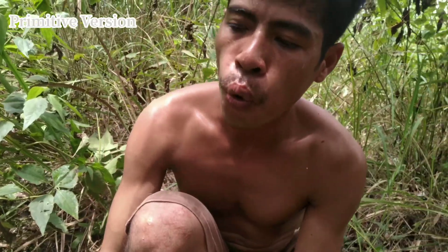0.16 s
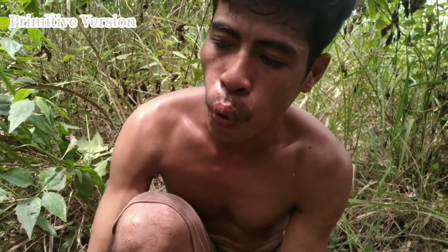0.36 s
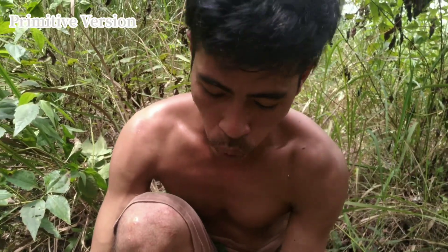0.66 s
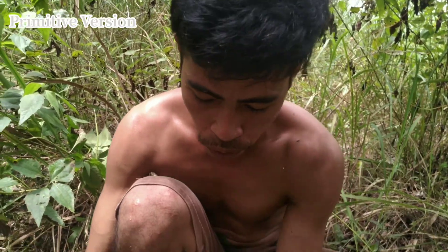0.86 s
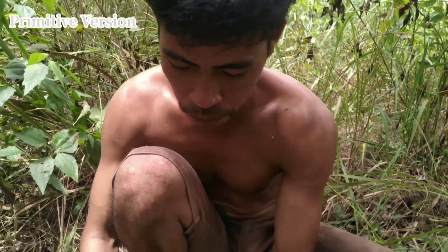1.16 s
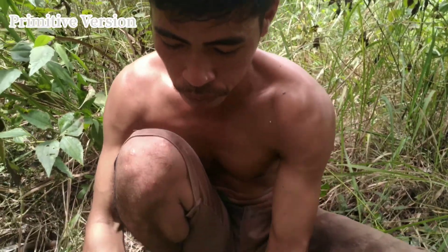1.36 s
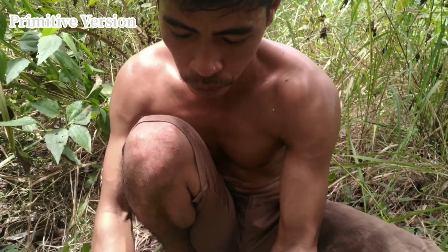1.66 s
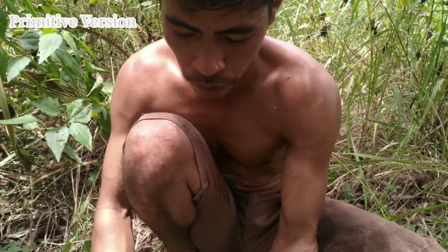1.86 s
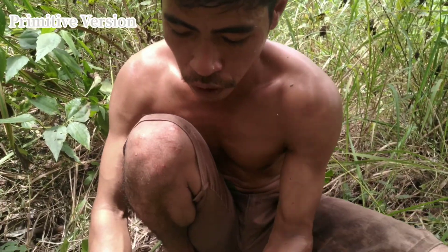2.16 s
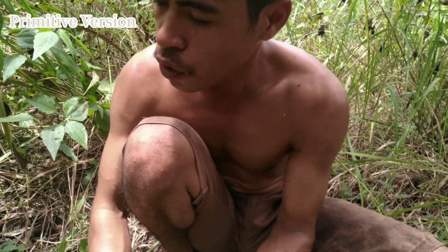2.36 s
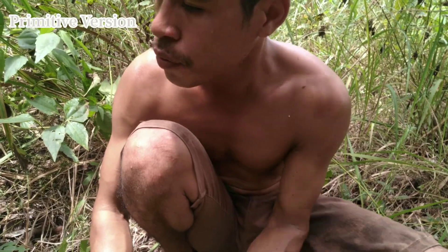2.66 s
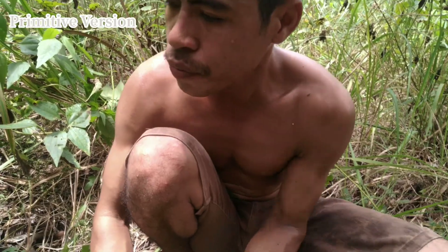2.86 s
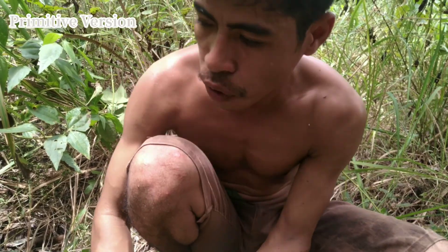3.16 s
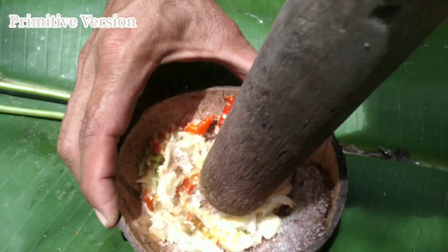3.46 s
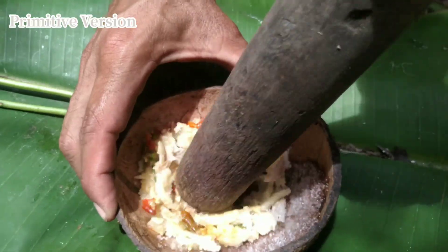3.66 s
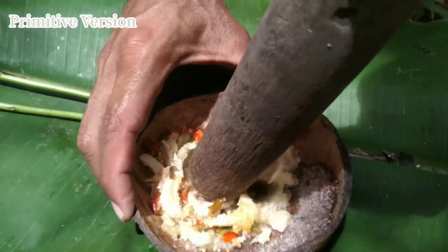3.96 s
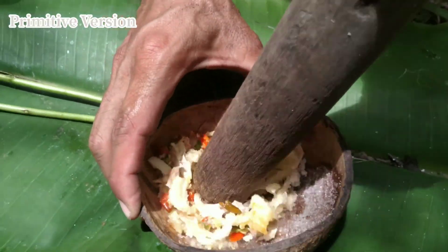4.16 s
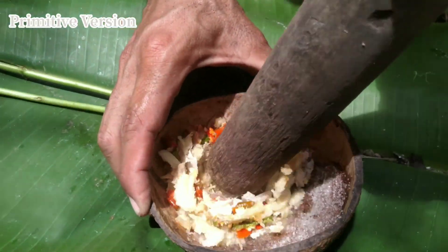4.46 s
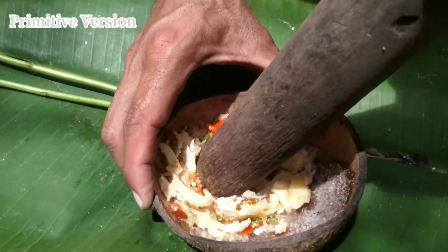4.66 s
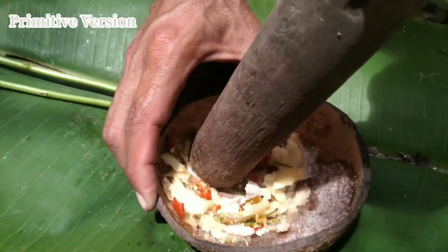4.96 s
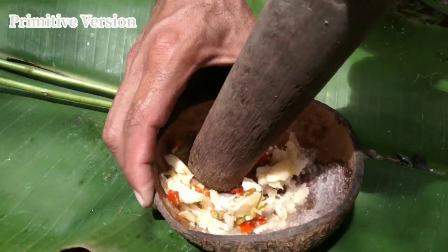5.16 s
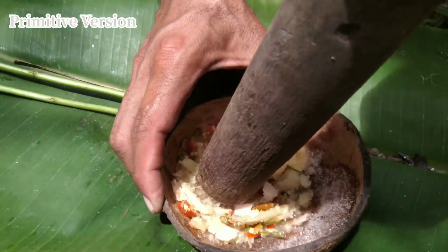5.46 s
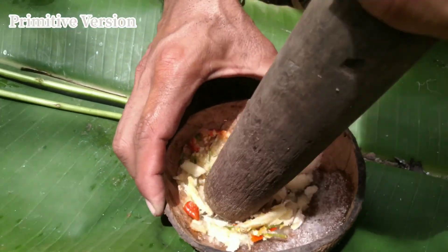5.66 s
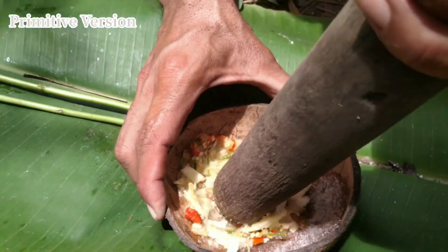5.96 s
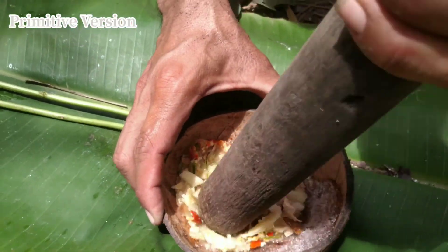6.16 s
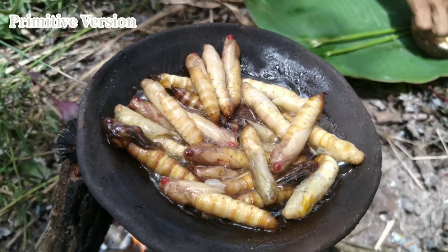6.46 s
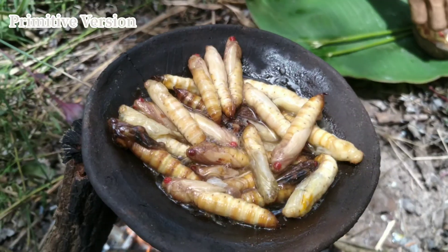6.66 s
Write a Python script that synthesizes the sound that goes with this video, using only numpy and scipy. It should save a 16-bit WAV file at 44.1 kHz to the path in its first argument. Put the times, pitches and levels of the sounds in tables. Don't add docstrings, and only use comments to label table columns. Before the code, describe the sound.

From 0 to 3.4 seconds a wooden pestle taps food in a small shell mortar, roughly every 0.23 seconds: short dull knocks of uneven strength, a muted hollow ring, a soft low thud from the soil just after, and light wet crunching. A dry twig snaps at about 1.7. Underneath, a distant one-cylinder engine puffs ten times a second as a low throb, with leaf hiss and wind rumble mostly on the left. A hard cut leaves a blink of silence. From 3.4 to 6.3 the blows come about every 0.26 seconds, harder and closer, strongest near 4.4, with juicy crunches, squeaks, sliding paste and crumbs ticking. Wind slaps the left side at 5.6 and 6.2. After another brief silence, from 6.35 to 7 the bed fades back quickly without pounding, and fat sizzles faintly with crisp little spits. Close, dry stereo pickup in open air.

```python
import sys
import numpy as np
from scipy import signal
from scipy.fft import rfft, irfft
from scipy.io import wavfile
from scipy.ndimage import uniform_filter1d

SR = 44100
rng = np.random.default_rng(int(sys.argv[2]) if len(sys.argv) > 2 else 0)


def unload_wav(signal):
    wavfile.write(
        sys.argv[1],
        SR,
        np.round(np.clip(np.atleast_2d(signal).T, -1, 1) * 32767).astype(np.int16),
    )


def nominal_scale(level):
    x = np.asarray(level, float) / 20
    return 10 ** x


N = 300762
TIME = np.arange(N) / SR
FREQ = np.maximum(np.fft.rfftfreq(N, 1 / SR), 1)

# start in seconds, end in seconds, fade-in in seconds, engine level in dB,
# leaf hiss level in dB.
SHOTS = [
    (0, 3.389, 0.00062, -39.5, 4.5),
    (3.435, 6.288, 0.22, -38.5, 2.5),
    (6.345, 7, 0.24, -38, 5),
]
CUT_S = 0.00008

# time in seconds, knock peak in dB, contact length in ms,
# shell ring in dB, dwell (how long the pestle stays pressed, as a share).
BLOWS = [(.001, -55, 0.55, -3, .2), (.222, -27.5, 0.52, -2, .1), (.455, -33, 0.44, 5, .2),
         (.684, -40.5, 0.52, 4.5, .2), (.917, -34, 0.64, 4, .2), (.923, -55.5, 0.51, 3, .2),
         (1.136, -45.5, 0.24, 1.5, .2), (1.359, -47, 0.25, 2, .2), (1.5765, -36.5, 0.43, -4, .3),
         (1.816, -46.5, 0.28, -8, .2), (2.010, -39.5, 0.6, 5, .2), (2.240, -39, .4, 4, .2),
         (2.489, -45.5, 0.32, 5, .2), (2.708, -52, 0.4, 2, .2), (2.943, -43, .8, 3, .2),
         (3.169, -39.5, 0.91, 0, .2), (3.6056, -21.5, 0.82, 8, .05), (3.8548, -21.5, 0.27, -13, 1.5),
         (4.1344, -17, 0.44, -11, .5), (4.146, -34.5, 0.33, -4, .2), (4.3865, -11.5, .36, -6, .15),
         (4.647, -29, 1.03, -3.5, .3), (4.661, -34, 0.43, 3, .2), (4.913, -37, 0.69, 0, .2),
         (5.1744, -20, 0.33, -18, .15), (5.423, -49, 0.4, 5, .2), (5.665, -47, 0.36, -4, .2),
         (5.902, -42, 0.8, 5, .3), (6.146, -32, 0.68, 5, .3)]
BOUNCES = [(5.1769, -29, 0.55, -12, 0.9), (5.182, -36, 0.37, 0, 0.47), (4.1405, -39, .45, -2, .1),
           (6.148, -32, 0.39, 0, 0.23), (1.584, -39.5, 0.3, 0, 0.092)]
# pitch in Hz, level in dB, time to fade by 60 dB in seconds.
SHELL = [(237.7, -1, 0.025), (325, -8, 0.035), (426, -8.5, 0.016), (632, -2, 0.019), (900, -4.5, 0.027),
         (1260, -6.5, 0.017), (1550, -12, .01), (4440, -9, .01)]
DIP_SHARE, DIP_LOSS_PER_MS = 1.35, 1.12
RELEASE_MS, REBOUND = 4.294, 0.18
# frequency in Hz, level in dB per Hz.
CRACK = [(500, -12.5), (1000, 0), (1600, 12.5), (2300, -5), (3200, -4), (4400, -7.5), (6000, -14.5),
         (8000, -36), (11000, -26.5), (16000, -17.5)]
CRACK_DB, CRACK_DB_PER_MS = -36, 17.5
CRACK_LATE = 2.2

# first crest in seconds, level in dB, pitch in Hz,
# depth of the dip before it (0 to 2), ring time in ms.
THUDS = [(.035, -48, 98, .6, 20), (0.237, -33.5, 80, 0.85, 21), (.466, -32.5, 92, 0.54, 18),
         (0.701, -33.5, 96, 0.67, 12), (.933, -35, 96, 0.76, 9), (1.149, -47, 105, .6, 20),
         (1.376, -42.5, 102, 0.51, 14), (1.598, -39, 90, .3, 14), (2.0241, -38.5, 91, .6, 25),
         (2.257, -48, 106, .6, 20), (2.497, -46.5, 75, .6, 20), (2.957, -50, 65, .6, 22),
         (3.186, -41, 78, .6, 19), (3.6202, -26, 79, .5, 17), (3.871, -29, 75, .3, 14.6),
         (4.152, -24, 80, .1, 13), (4.403, -21, 85.4, .03, 9.6), (4.678, -28.5, 75, 1.3, 4.3),
         (4.9446, -32, 72, 0.95, 15), (5.192, -20, 84, 0.55, 13), (5.438, -32.5, 84, 0.79, 16),
         (5.6767, -32, 94, 1.4, 14), (5.915, -24, 92, 1.2, 13), (6.160, -26.5, 96, 1.5, 17)]
THUD_DIP_MS = 3.78

# peak time in seconds, level in dB, fall time in ms,
# pitch of the hollow under the pestle in Hz.
CRUSHES = [(0.002, -58, 8, 3720), (0.225, -51, 6.7, 3580), (0.454, -57, 19, 3800), (0.691, -55.5, 11, 3420),
           (0.926, -52.5, 6, 1570), (1.14, -56, 11, 4130), (1.369, -54.5, 11, 4330),
           (1.583, -52.5, 12.4, 4400), (1.821, -54.5, 12.5, 4140), (2.014, -54, 18.7, 4140),
           (2.259, -50, 15.3, 4350), (2.501, -53, 11, 3750), (2.722, -60, 22, 3730),
           (2.955, -57.5, 22, 3930), (3.187, -56.5, 14, 3780), (3.614, -48.5, 16.2, 3340),
           (3.87, -47, 17.5, 3900), (4.151, -47.5, 12.2, 3320), (4.39, -42, 14.4, 4600),
           (4.666, -44.5, 12.3, 3240), (4.92, -48, 15, 1010), (5.1775, -47.5, 13.6, 3020),
           (5.427, -49, 9.3, 2980), (5.666, -45, 8.5, 3600), (5.905, -41.5, 5.8, 1520),
           (6.148, -45.5, 9.9, 3370)]
PULP_DB = [2.5, 0, 2.5, 2, 2, -1.5, 2, -1, -1.5, -2, -1, 0, -0.5, 0.5, -1, -3.5, -1.5, -3.5, -3, -4, 0.5,
           1.5, 0.5, -0.5, -3.5, 0]
# peak time in seconds, level in dB,
# fall time in ms, pitch of the hollow in Hz.
SLIDES = [(0.266, -70, 8.2, 3170), (0.825, -70, 7.2, 2800), (3.132, -66, 5.4, 2400),
          (3.664, -72.5, 10, 3500), (3.932, -60, 21, 3770), (4.128, -55, 32, 4900), (4.414, -57, 4.5, 3730),
          (4.465, -70, 26, 3700), (4.721, -59.5, 10, 3580), (5.009, -67, 5.6, 3220),
          (5.232, -65, 8.5, 2880), (5.405, -68, 6.1, 4300), (5.415, -60, 6.2, 3000),
          (5.655, -53, 7.9, 3300), (5.707, -63.5, 5.5, 3400), (5.886, -62.5, 24, 4800),
          (6.142, -58.5, 4.6, 3580), (0.075, -70, 18, 3200)]
# frequency in Hz, level in dB per Hz.
CRUSH = [(710, -41.5), (1200, -6), (1730, 2), (2300, -9.5), (3050, -8), (3590, -9.5), (4450, -9),
         (5020, -13), (6650, -16.5), (7820, -38), (10100, -18), (14200, -26), (16000, -28)]
# frequency in Hz, level in dB per Hz.
DULL = [(150, 6.5), (300, -3), (700, 0), (1200, -5.5), (2200, -36.5)]
RISE_SHARE, TOUCH_LAG_MS, EARLY_MS_PER_DB = 0.69, 1.1, 0.1267
HARD_BLOW_DB, DULL_DB, DULL_PER_BLOW_DB = -14.5, 6, 0.22
SLIDE_RISE_MS, SLIDE_DULL_DB = 4.5, -3.5

# time in seconds, peak in dB, centre frequency in Hz.
TICKS = [(0.265, -66, 3080), (0.28, -43.5, 1470), (0.340, -40, 734), (.659, -55, 3000), (1.611, -43, 800),
         (1.627, -51, 750), (1.912, -48, 1200), (3.133, -50.5, 2430), (3.144, -58, 2400),
         (3.666, -54, 2500), (4.017, -57.5, 4000), (4.435, -45.5, 1200), (4.496, -44.5, 486),
         (4.557, -50, 1320), (4.627, -56, 2000), (3.6255, -45, 3520), (4.1295, -45, 900),
         (4.3985, -45, 3000), (4.3885, -36, 4500), (.686, -42, 700), (.2255, -44, 1600), (1.817, -46, 450),
         (4.9215, -40, 1000), (4.1395, -32, 1200), (3.861, -36, 1200), (5.193, -40, 1100),
         (5.1805, -46, 1000), (5.1852, -42, 1000), (3.8725, -56, 4400), (4.154, -55, 3500),
         (4.668, -46, 3200), (5.204, -44, 900), (5.247, -63, 4000), (5.473, -43, 900), (5.958, -54.5, 3000)]
# time in seconds, peak in dB, centre frequency in Hz.
TWIGS = [
    (1.6672, -33.5, 2000),
    (6.2585, -58, 900),
]
# middle in seconds, level in dB, pitch in Hz.
POPS = [(0.0032, -54, 3620), (0.2257, -47, 3700), (0.2272, -55, 2240), (0.4572, -55, 2500),
        (0.4575, -54, 3620), (0.6914, -52, 3450), (0.9249, -52, 2500), (0.9269, -55, 3790),
        (1.1377, -52, 4130), (1.1414, -56, 4310), (1.1437, -56, 3960), (1.3689, -54, 4220),
        (1.3751, -56, 4220), (1.5804, -52, 3620), (1.5851, -51, 4310), (1.5864, -54, 2240),
        (1.8211, -51, 4050), (2.0139, -49, 4050), (2.0184, -48, 4220), (2.2429, -56, 4390),
        (2.2541, -51, 4130), (2.2546, -53, 3190), (2.2596, -45, 4130), (2.2654, -47, 4390),
        (2.2686, -54, 3270), (2.2716, -51, 3960), (2.4886, -52, 3270), (2.4926, -54, 4130),
        (2.4998, -54, 4220), (2.5043, -50, 3620), (2.7221, -55, 3100), (2.949, -54, 4130),
        (2.9578, -55, 3010), (2.9618, -55, 3700), (3.1888, -50, 3530), (3.6125, -45, 3450),
        (3.8727, -45, 4390), (3.8784, -46, 3700), (4.1378, -48, 4570), (4.1421, -48, 4740),
        (4.1451, -45, 2580), (4.1538, -45, 3620), (4.389, -47, 2760), (4.3893, -34, 4480),
        (4.394, -41, 4480), (4.3988, -43, 3100), (4.4067, -46, 3700), (4.6564, -49, 4220),
        (4.6651, -39, 3530), (4.6679, -39, 2930), (4.6749, -44, 3270), (5.1772, -46, 3190),
        (5.1775, -47, 4480), (5.4289, -48, 3010), (5.6664, -42, 3190), (5.9038, -40, 3530),
        (5.9053, -40, 1290), (5.9093, -45, 2930), (6.1495, -42, 3700), (6.1555, -46, 3450)]
POP_DB, POP_MS = -4.5, 1.15
# time in seconds, level in dB, pitch in Hz.
KNOTS = [(5.185, -31, 1150), (5.1925, -38, 950), (5.2055, -40, 800), (3.865, -41, 800), (4.129, -44, 900),
         (4.1495, -33, 850), (4.678, -42, 1650), (4.665, -41, 500), (2.248, -44, 810), (2.26, -41, 660),
         (2.499, -45, 850), (1.366, -46, 830), (1.587, -42, 800), (.924, -41, 900), (4.9225, -37, 1010),
         (5.666, -38, 810), (5.658, -43, 1600), (2.017, -47, 890), (1.668, -45, 1130), (1.669, -48, 1900),
         (5.901, -44, 1410), (5.426, -44, 710), (5.1765, -36, 1550), (5.181, -38, 1200),
         (3.8605, -37, 1150), (4.138, -36, 1200), (4.399, -36, 950), (4.392, -30, 760), (3.611, -33, 210),
         (5.182, -33, 210), (4.141, -33, 280), (.2255, -48, 1650), (1.151, -51, 800), (6.15, -42, 1000)]
# frequency in Hz, left minus right in dB.
PESTLE_BALANCE = [(60, -5.0), (110, -6.5), (200, -9.5), (380, -9.5), (700, -7.5), (1290, -5.5), (2380, 2.5),
                  (4400, 4.0), (8120, -0.5), (15000, -2.0)]
LEFT_LAG_S = 11 / 44100

# peak time in seconds, level in dB.
GUSTS = [(0.0, -39), (0.25, -53), (0.5, -47), (1.125, -44), (1.375, -50), (1.625, -44), (2.125, -45.5),
         (3.0, -40.5), (3.25, -47), (3.5, -42.5), (3.9, -42), (4.25, -34), (4.6, -38.5), (5.5, -41),
         (5.86, -39), (6.375, -45), (6.625, -42.5)]
CALM_DB, GUST_FADE_DB_PER_S = -51.5, 98
# frequency in Hz, level in dB per Hz.
WIND = [(20, -34), (35, -3), (52, 10), (70, 2), (110, -17), (200, -13), (400, -63)]
# time in seconds, peak in dB, ring pitch in Hz,
# ring time in ms, flutter level in dB.
SLAPS = [(1.236, -46.5, 70, 9.9, -64), (2.974, -38.5, 68, 10.6, -50.5), (3.296, -41, 72, 9.5, -52.5),
         (5.624, -42.5, 70, 6.1, -46), (6.196, -34, 68, 6.8, -40.5), (6.255, -45.5, 69, 25, -46.5)]

# frequency in Hz, level in dB per Hz.
AIR = [(18, -34.5), (30, -6), (75, -7), (93, -11), (109, -7.5), (200, -16), (330, -28.5), (584, -29.5),
       (1540, -35), (2750, -35.5), (3140, -37), (3770, -37), (7870, -47.5), (13000, -43.5), (16000, -50)]
# frequency in Hz, left minus right in dB.
AIR_BALANCE = [(60, -1), (200, -6), (700, -4.5), (3000, -2), (8000, -0.5), (15000, -1.5)]
AIR_DB = -57.5

# time of one puff in seconds, time between puffs in seconds.
PUFFS = [(.138, .10055), (3.519, .10057), (6.457, .1004)]

# frequency in Hz, level in dB per Hz.
SIZZLE = [(710, -39), (1200, -8), (1640, -15), (1790, -30), (2100, -14), (3080, -2), (3910, -6), (6370, -9),
          (8080, -27), (9720, -15.5), (16000, -21)]
# time in seconds, level in dB.
SIZZLE_DB = [(6.4, -69), (6.6, -69.5), (6.74, -70), (6.78, -67), (6.82, -65)]
# time in seconds, peak in dB.
SPITS = [(6.3694, -62), (6.4053, -49), (6.475, -54), (6.4854, -49), (6.537, -43), (6.544, -47),
         (6.647, -52), (6.6723, -39.5), (6.683, -46), (6.56, -52), (6.605, -52), (6.778, -47), (6.787, -45),
         (6.796, -40), (6.812, -45)]
PAN_LAG = (12, 0)


def curve(table, hz=FREQ):
    f, db = np.transpose(table)
    return nominal_scale(np.interp(np.log(hz), np.log(f), db))


def colour(x, table):
    y = irfft(rfft(x) * curve(table), N)
    return y / np.sqrt(np.mean(y ** 2))


def walk(rate):
    k = int(SR / rate)
    steps = np.repeat(rng.standard_normal(N // k + 1), k)
    return 0.66 * uniform_filter1d(uniform_filter1d(steps, k), k)[:N]


def grains(spread_db):
    size = np.minimum(rng.exponential(size=N // 16 + 1), 3.5)
    return rng.standard_normal(N) * nominal_scale(spread_db * np.repeat(size, 16)[:N])


def patchy(x, spread_db, rate):
    spectrum, out = rfft(x), 0
    for step in range(14, 29):
        band = np.cos(np.pi / 2 * np.clip(2 * np.log2(FREQ) - step, -1, 1)) ** 2
        out = out + nominal_scale(spread_db * walk(rate)) * irfft(spectrum * band, N)
    return out / np.sqrt(np.mean(out ** 2))


def add(track, s, x):
    i = max(int(s * SR), 0)
    track[i:i + len(x)] += x[:max(len(track) - i, 0)]


def contact(ms, contact_ms, dwell):
    def bump(at, rise, fall):
        return np.exp(-((ms - at) / np.where(ms < at, rise, fall)) ** 2)

    depth = np.clip(DIP_SHARE - DIP_LOSS_PER_MS * contact_ms, 0, 2)
    dip = depth * bump(0, 1.56 * contact_ms, 0.99 * contact_ms)
    crest = bump(1.94 * contact_ms, 1.04 * contact_ms, 1.18 * contact_ms)
    plateau = dwell * bump(0.59 * RELEASE_MS, 2.0, 0.7)
    release = (REBOUND + 0.72 * dwell) * bump(RELEASE_MS, 0.34, 0.74)
    return crest - dip + plateau - release


def shell_ring(t, ring_db, luck):
    ring = 0
    for k, (hz, db, t60) in enumerate(SHELL):
        level = nominal_scale(db + ring_db + 0.68 * luck[k]) * 2 * np.pi * hz / SR
        note = np.cos(2 * np.pi * hz * (1 + 0.12 * luck[-k - 1]) * t)
        ring = ring + level * note * np.exp(-np.log(1000) * t / t60)
    return ring


def knocks():
    out, crack, t = np.zeros(N), np.zeros(N), TIME[:SR // 16]
    hits = BLOWS + BOUNCES
    chance = rng.standard_normal((len(hits), 2 * len(SHELL)))
    for (s, db, contact_ms, ring_db, dwell), luck in zip(hits, chance):
        push = contact((t - 0.0026) * 1000, max(contact_ms, 0.15), np.clip(dwell, 0, 1.5))
        knock = push + np.convolve(push, shell_ring(t, ring_db, luck))[:len(t)]
        add(out, s, nominal_scale(db + 2.5) * knock / np.abs(knock).max())
        crack_s = s + 0.0015 + CRACK_LATE * contact_ms / 1000
        crack_db = db + CRACK_DB + CRACK_DB_PER_MS * contact_ms
        add(crack, crack_s, nominal_scale(crack_db) * np.exp(-t / 0.001))
    return out + crack * colour(grains(1.8), CRACK)


def strokes():
    rows = []
    for (s, db, fall_ms, hollow_hz), pulp_db in zip(CRUSHES, PULP_DB):
        touch, blow_db = next(blow[:2] for blow in BLOWS if blow[0] > s - 1 / 32)
        soft = HARD_BLOW_DB - blow_db
        rise_ms = RISE_SHARE * max((s - touch) * 1000 - TOUCH_LAG_MS, 0) + EARLY_MS_PER_DB * soft
        dull_db = DULL_DB - DULL_PER_BLOW_DB * soft + pulp_db
        rows.append((s, db, rise_ms, fall_ms, dull_db, hollow_hz))
    for s, db, fall_ms, hollow_hz in SLIDES:
        rows.append((s, db, SLIDE_RISE_MS, fall_ms, SLIDE_DULL_DB, hollow_hz))
    return rows


def crushes():
    out, size = np.zeros((2, N)), 8192
    bright = np.array([colour(grains(4.0), CRUSH) for _ in range(2)])
    dull = np.array([colour(grains(3.7), DULL) for _ in range(2)])
    bright = patchy(bright, 5.45, 170)
    dull = patchy(dull, 4.7, 90)
    for s, db, rise_ms, fall_ms, dull_db, hollow_hz in strokes():
        start = max(int(s * SR) - size // 2, 0)
        part = slice(start, start + size)
        t = TIME[part] - s
        u = t * 1000 / np.where(t < 0, max(rise_ms, 1), max(fall_ms, 2))
        shape = nominal_scale(db) * (np.exp(-1.1 * u ** 2) + 0.1 * np.exp(-(u / 3.36) ** 4))
        snaps = shape * bright[:, part]
        hollow = signal.lfilter(*signal.iirpeak(hollow_hz, 4.5, fs=SR), snaps)
        squelch = nominal_scale(3.5 + dull_db) * shape * dull[:, part]
        out[:, part] += nominal_scale(-1.2) * snaps + nominal_scale(-7) * hollow + squelch
    return out


def pops():
    out, t = np.zeros(N), TIME[:SR // 100]
    swell = np.exp(-((t - 1 / 200) * 1000 / POP_MS) ** 2)
    for s, db, hz in POPS:
        add(out, s - 1 / 200, nominal_scale(db + POP_DB) * np.sin(2 * np.pi * hz * t) * swell)
    for s, db, hz in KNOTS:
        add(out, s, -nominal_scale(db - 1.5) * np.sin(2 * np.pi * hz * t) * np.exp(-t / 0.0025))
    return out


def thud(hz, dip, ring_ms):
    t = TIME[:SR // 8] - 1 / 32
    turn = -1 / 4 / hz
    give = np.clip((turn - t) * 1000 / THUD_DIP_MS, 0, 1)
    fade = np.exp(-(np.maximum(t, 0) * 1000 / max(ring_ms, 3)) ** 1.4)
    ring = np.cos(2 * np.pi * hz * t) * fade
    return np.where(t < turn, -dip * np.sin(np.pi * give ** 0.67), ring)


def thuds():
    out = np.zeros(N)
    for s, db, hz, dip, ring_ms in THUDS:
        add(out, s - 1 / 32, nominal_scale(db - 1.5) * thud(hz, dip, ring_ms))
    return out


def ticks(table, rattle_gain, rattle_ms):
    out, t = np.zeros(N), TIME[:400]
    for (s, db, hz), noise in zip(table, rng.standard_normal((len(table), len(t)))):
        fading = noise * np.exp(-t * 1000 / rattle_ms)
        rattle = signal.lfilter(*signal.iirpeak(hz, 1.1, fs=SR), fading)
        snap = rattle_gain * rattle - np.exp(-((t - 0.0004) * hz * 4.0) ** 2)
        soft = signal.lfilter(*signal.butter(2, 1.15 * hz, fs=SR), snap)
        add(out, s - 0.0004, nominal_scale(db) * soft)
    return out


def pestle():
    crush, other = crushes()
    hits = knocks() + thuds() + ticks(TICKS, 1.84, 2.2) + pops()
    right = hits + crush
    unlike = np.clip(FREQ / 3970.0, 0, 0.9)
    left = rfft(hits) + np.sqrt(1 - unlike) * rfft(crush) + np.sqrt(unlike) * rfft(other)
    lag_s = LEFT_LAG_S + 0.00041 / (1 + (FREQ / 220) ** 2)
    left = irfft(left * curve(PESTLE_BALANCE) * np.exp(-2j * np.pi * FREQ * lag_s), N)
    return nominal_scale(4.0) * np.array([left, right])


def swing(hz, tau_s):
    t = TIME[:SR // 6]
    u = t / tau_s
    return -np.sin(2 * np.pi * hz * t) * (u * np.exp(1 - u)) ** 1.28


def wind():
    db = np.max([top - GUST_FADE_DB_PER_S * np.abs(TIME - s) for s, top in GUSTS], axis=0)
    gust = nominal_scale(np.maximum(db, CALM_DB) + 4.6 * walk(6.9))
    left = gust * colour(rng.standard_normal(N), WIND)
    t, flutter_t = TIME[:SR // 60], TIME[:SR // 20]
    edge = np.cos(2 * np.pi * 210 * (t - 0.005)) * np.exp(-((t - 0.0045) / 0.0018) ** 2)
    for s, db, hz, ring_ms, flutter_db in SLAPS:
        add(left, s + 0.00085, nominal_scale(db + 8.5) * edge)
        flutter = rng.standard_normal(SR // 20)
        for sharpness in (2.5, 1.5):
            flutter = signal.lfilter(*signal.iirpeak(340, sharpness, fs=SR), flutter)
        add(left, s + 0.0026, nominal_scale(flutter_db + 22.5) * flutter * np.exp(-flutter_t / 0.013))
        add(left, s + 0.0027, -nominal_scale(db + 7.5) * swing(hz, max(ring_ms, 3) / 1000))
    right = nominal_scale(-64.5 + 2.0 * walk(15)) * colour(rng.standard_normal(N), WIND)
    return np.array([left, right])


def air():
    out, swell = 0, walk(0.13)
    mid, left, right = (rfft(colour(rng.standard_normal(N), AIR)) for _ in range(3))
    alike = np.clip(1 - FREQ / 504.0, 0, 0.8)
    pair = np.sqrt(alike) * mid + np.sqrt(1 - alike) * np.array([left, right])
    pair *= np.array([curve(AIR_BALANCE) ** 0.5, curve(AIR_BALANCE) ** -0.5])
    for octave in range(5, 15):
        band = np.cos(np.pi / 2 * np.clip(np.log2(FREQ) - octave, -1, 1)) ** 2
        out = out + nominal_scale(0.21 * swell + 1.0 * walk(9.6)) * irfft(pair * band, N)
    return nominal_scale(AIR_DB) * out


def engine():
    out, t = np.zeros((2, N)), TIME[:SR // 16] - 1 / 32
    echo = -np.exp(-(t / 0.003) ** 2)
    for (start, end, _, db, _), (first, period) in zip(SHOTS, PUFFS):
        for s in first + period * np.arange(-2, 34):
            size_db, shift = rng.standard_normal(2)
            if not start < s < end:
                continue
            for track, pan_db, lag in zip(out, (-2.5, 1.5), (0.0003, 0)):
                puff = -np.sin(2 * np.pi * 104 * (t - lag)) * np.exp(-((t - lag) / 0.0085) ** 2)
                add(track, s + 0.00047 * shift - 1 / 32, nominal_scale(db + pan_db + 0.45 * size_db) * puff)
                for late_s, echo_db in ((0.021, -13), (0.053, -14)):
                    add(track, s + late_s - 1 / 32, nominal_scale(db + pan_db + echo_db) * echo)
    return out


def pan():
    s, db = np.transpose(SIZZLE_DB)
    level = nominal_scale(np.interp(TIME, s, db) + 2.0 * walk(40)) * (TIME > SHOTS[2][0])
    shared, spits = grains(3.1), np.zeros(N)
    for s, db in SPITS:
        burst = rng.standard_normal(64) * np.exp(-TIME[:64] / 0.00033)
        add(spits, s + 0.0013, nominal_scale(db - 3.0) * burst)
    spits = irfft(rfft(spits) * curve(SIZZLE), N) * nominal_scale(15.5)
    ports = []
    for side_db, lag in zip((-0.8, 0.8), PAN_LAG):
        crackle = colour(0.71 * np.roll(shared, lag) + grains(5.6), SIZZLE)
        ports.append(nominal_scale(7.0 + side_db) * level * crackle + np.roll(spits, lag))
    return np.array(ports)


def scene():
    hiss = sum(nominal_scale(db) * (TIME >= start) * (TIME < end) for start, end, *_, db in SHOTS)
    return pestle() + ticks(TWIGS, 1.06, 2.9) + wind() + hiss * air() + engine() + pan()


def roll_off(x):
    return signal.sosfilt(signal.butter(12, 15810, fs=SR, output="sos"), x)


def record(dry):
    notch = 1 - 0.34 * np.exp(-((FREQ - 8000) / 640.0) ** 2)
    edges = (FREQ < 15800) / np.sqrt(1 + (44 / FREQ) ** 8)
    heard = irfft(rfft(dry) * notch * edges, N)
    gate = np.zeros(N)
    for start, end, fade, *_ in SHOTS:
        fade_in = np.clip((TIME - start) / fade, 0, 1) ** 0.78
        gate += fade_in * np.clip((end - TIME) / CUT_S, 0, 1)
    return roll_off(heard * gate)


dry = scene()
out = record(dry)
unload_wav(out)
```